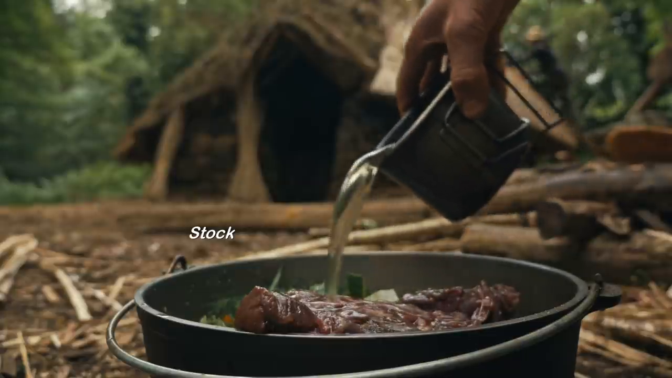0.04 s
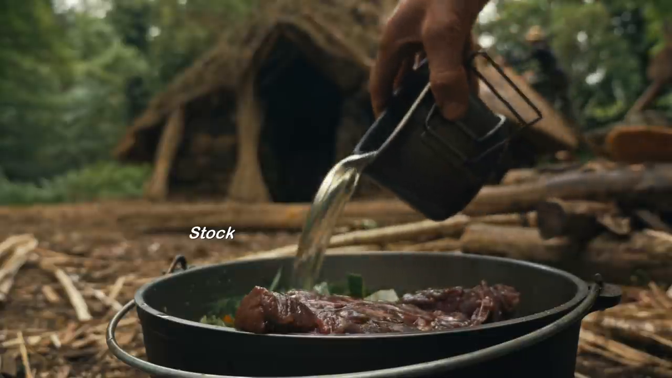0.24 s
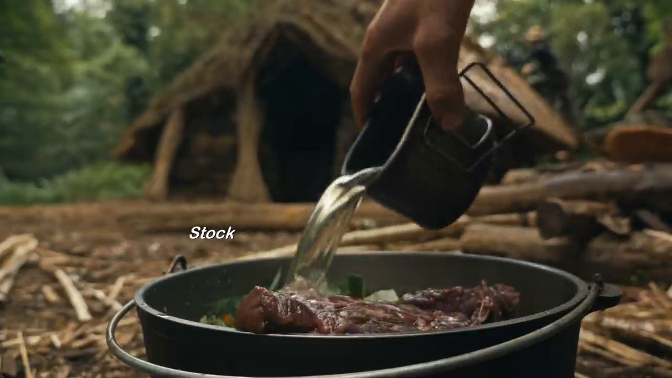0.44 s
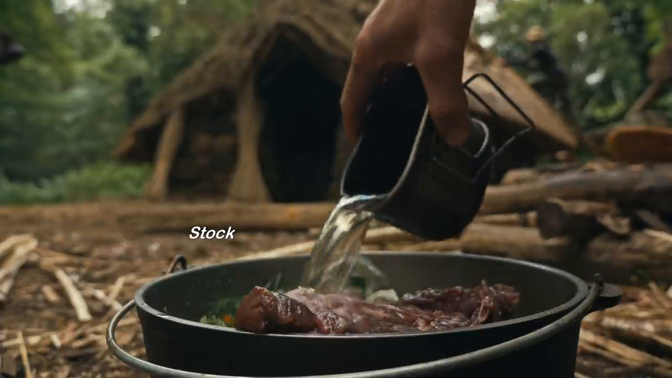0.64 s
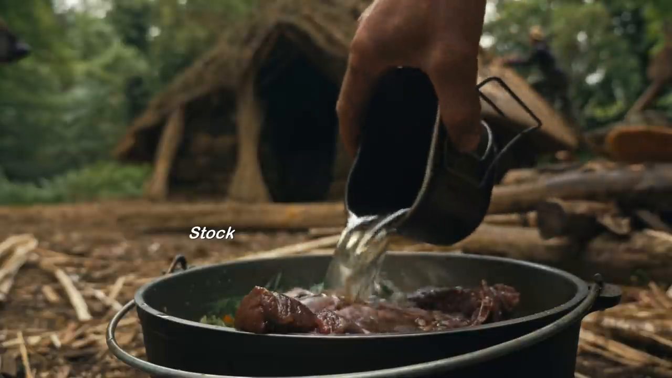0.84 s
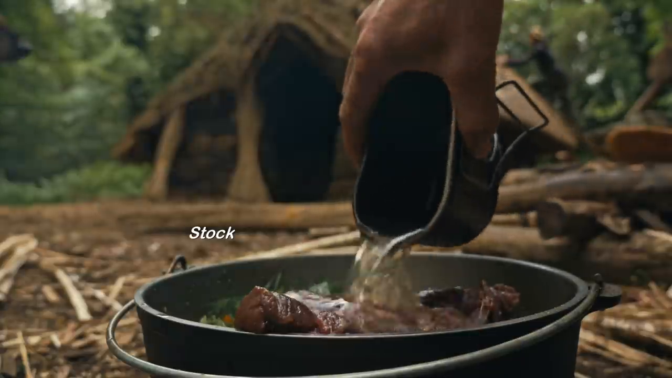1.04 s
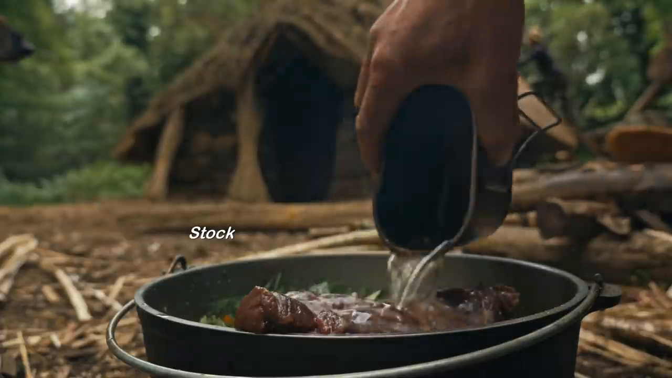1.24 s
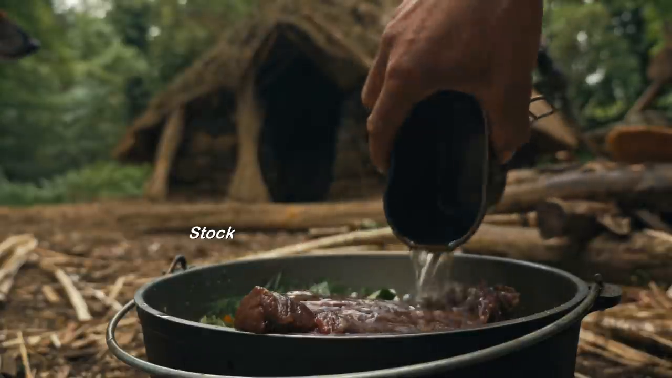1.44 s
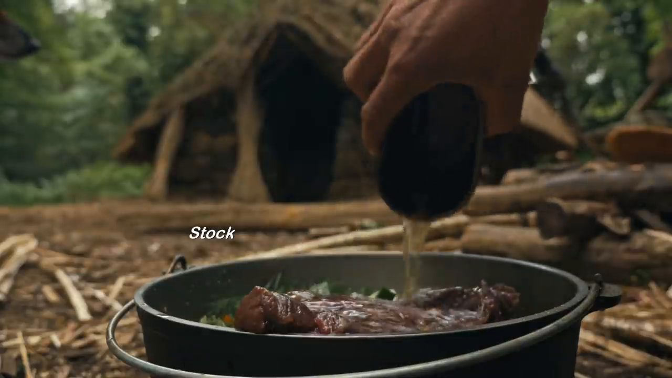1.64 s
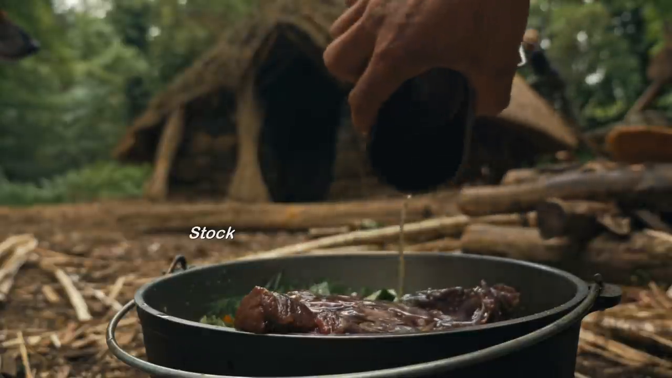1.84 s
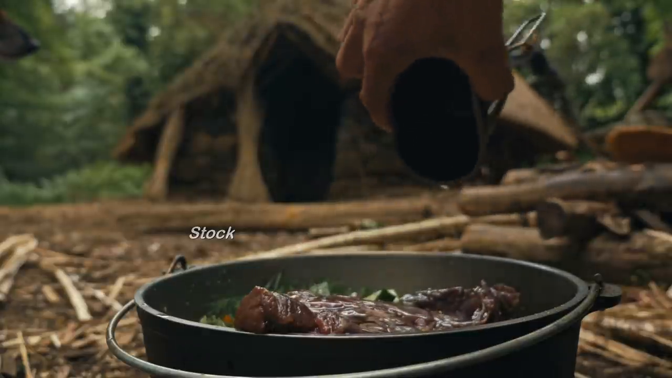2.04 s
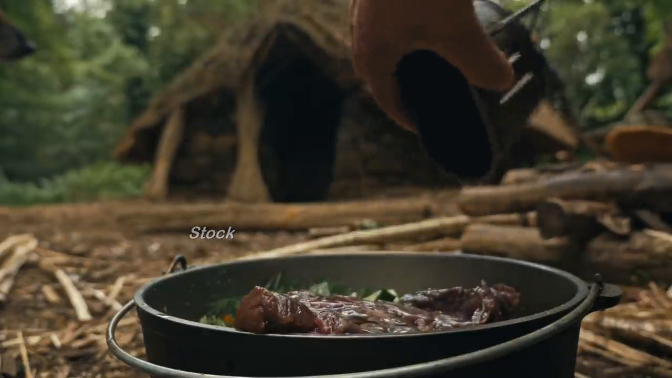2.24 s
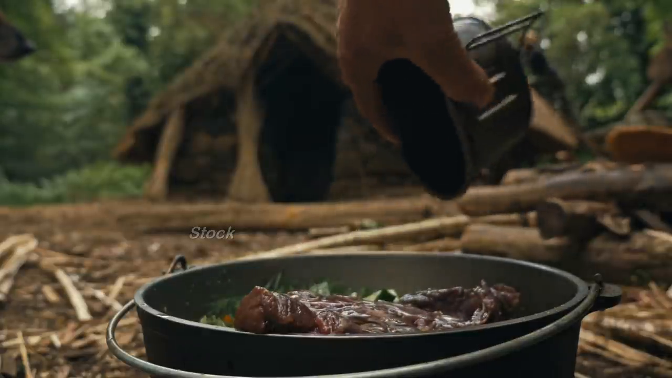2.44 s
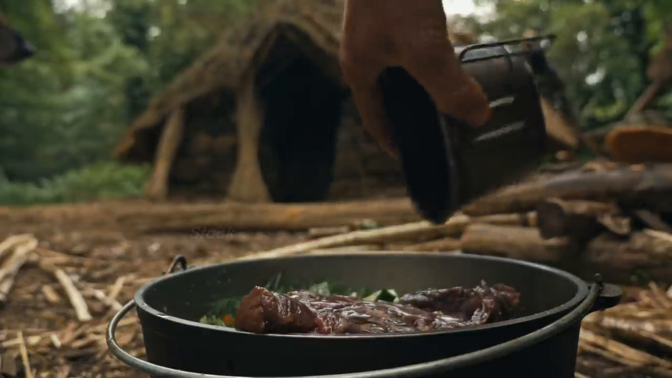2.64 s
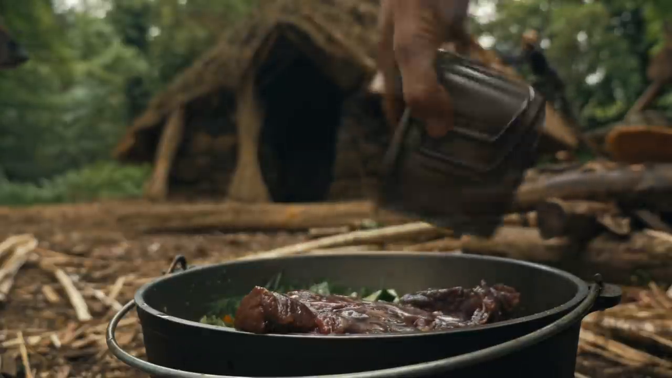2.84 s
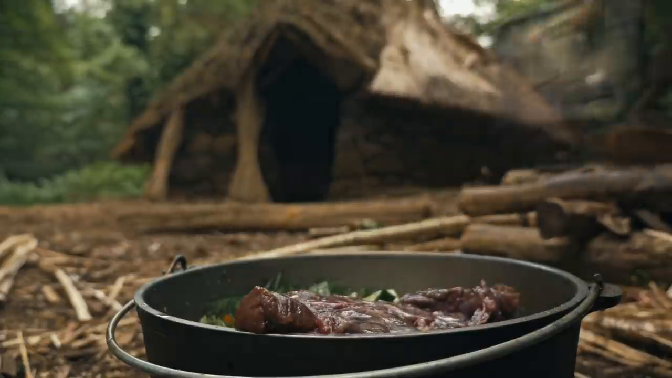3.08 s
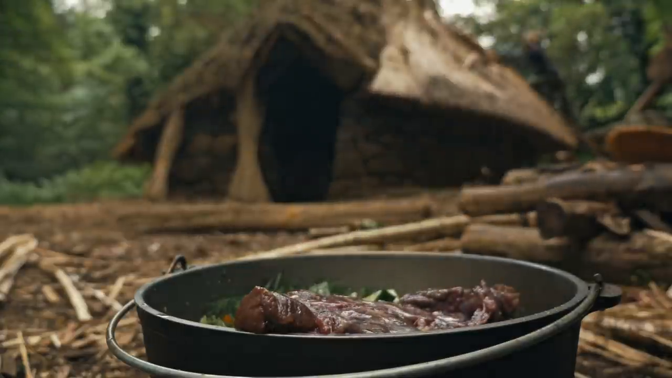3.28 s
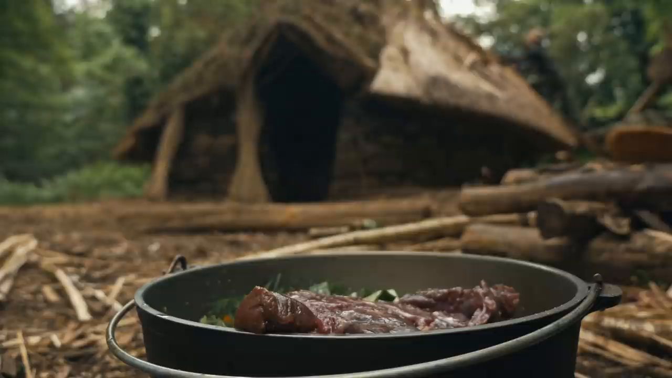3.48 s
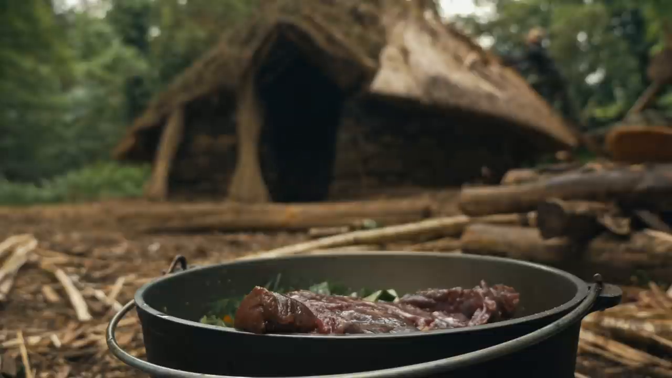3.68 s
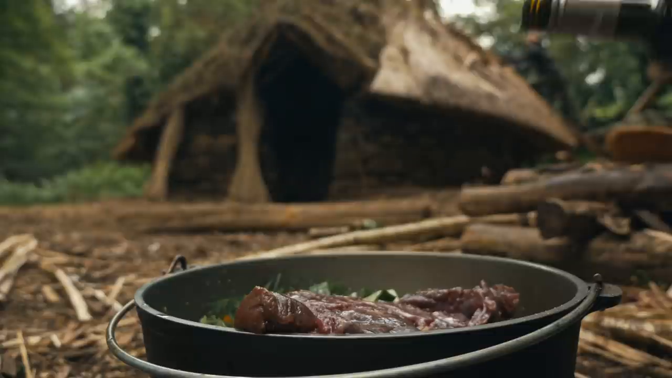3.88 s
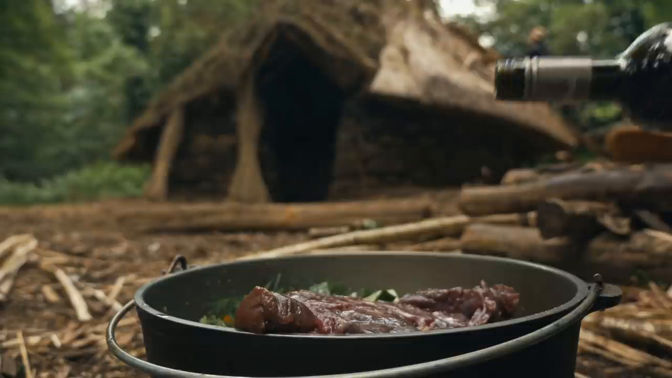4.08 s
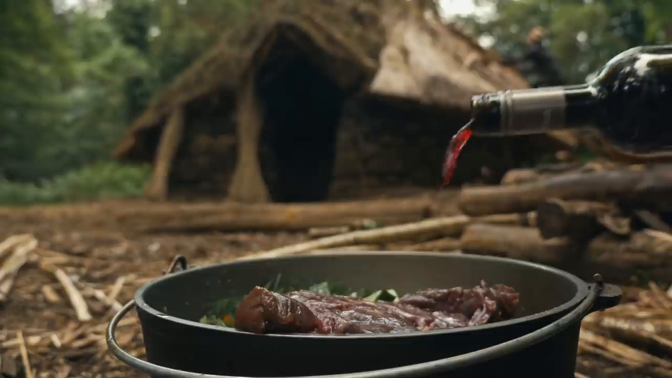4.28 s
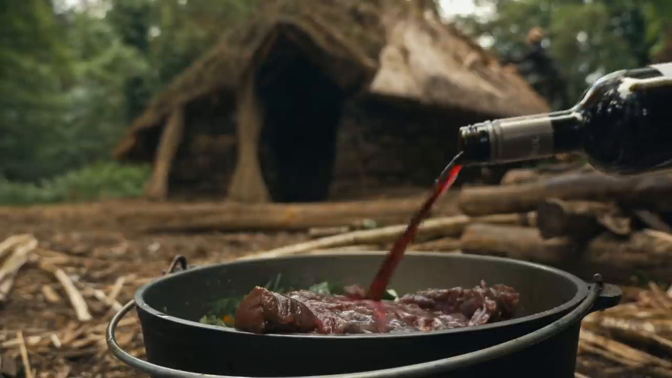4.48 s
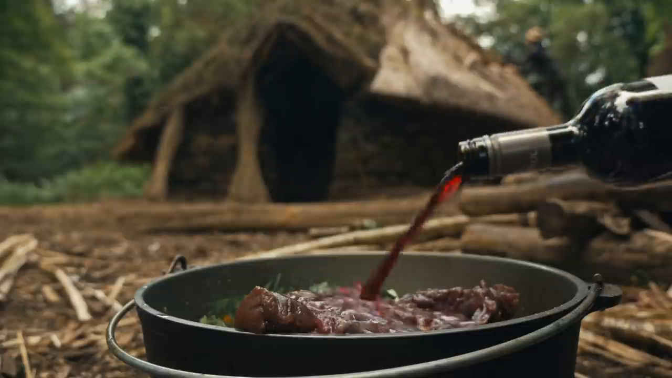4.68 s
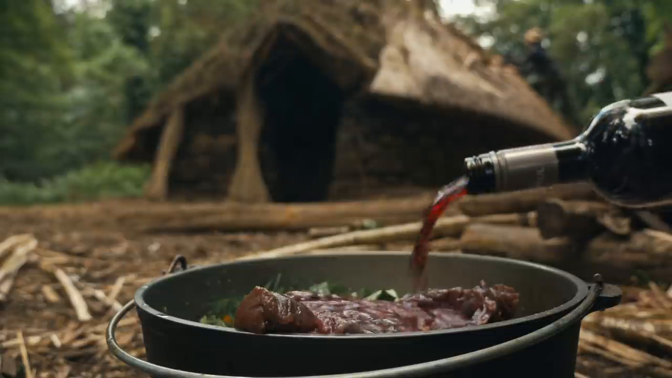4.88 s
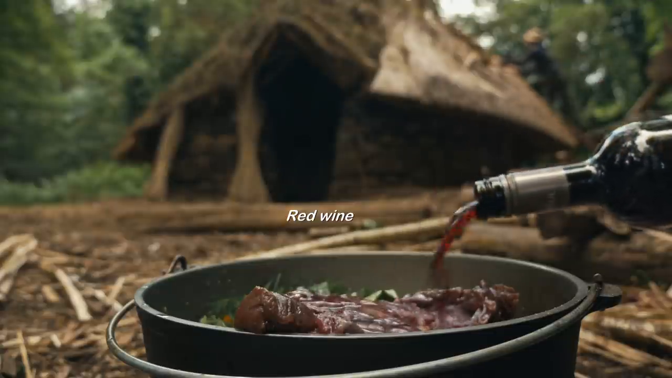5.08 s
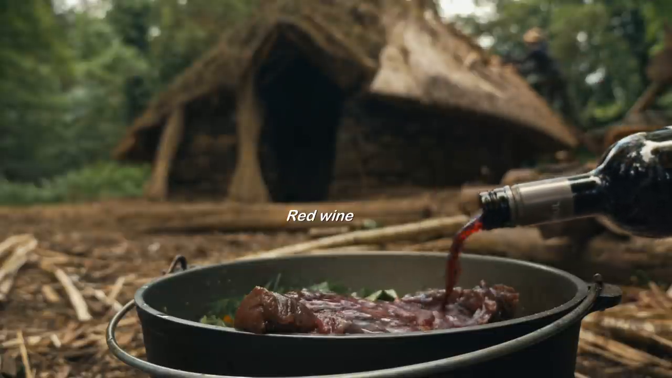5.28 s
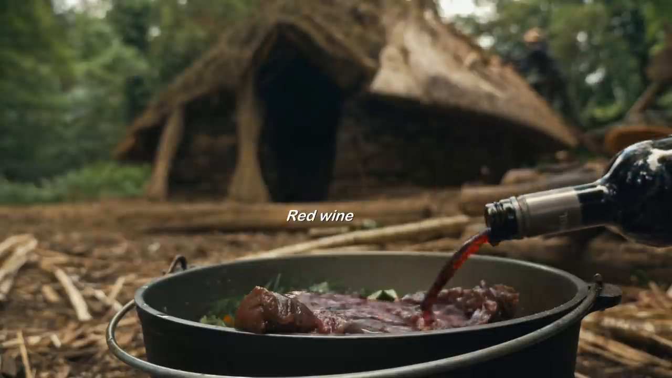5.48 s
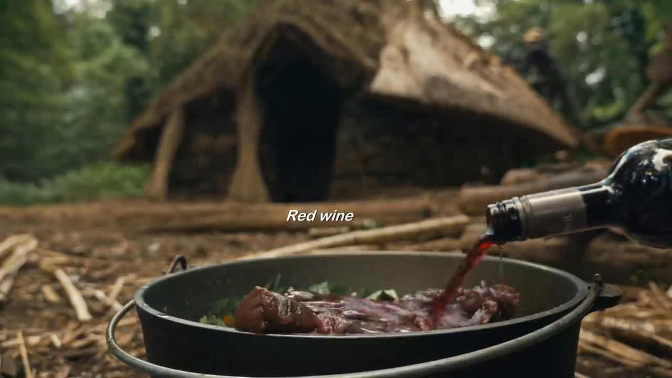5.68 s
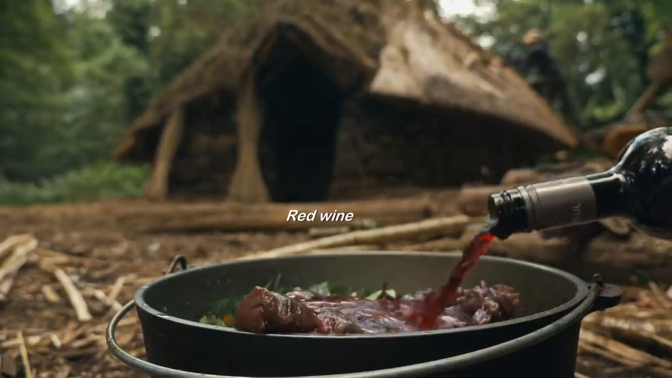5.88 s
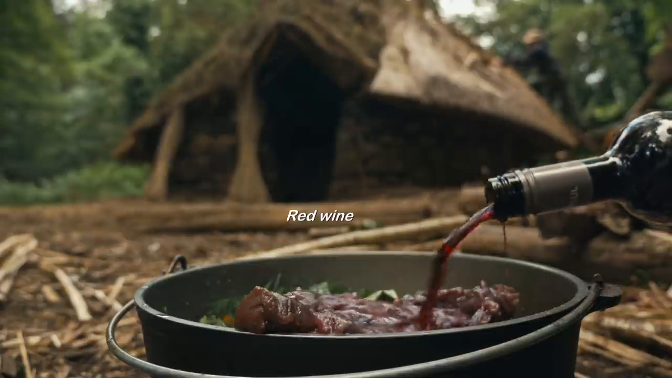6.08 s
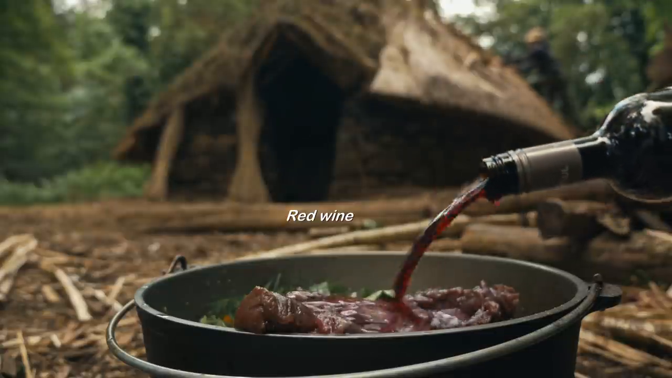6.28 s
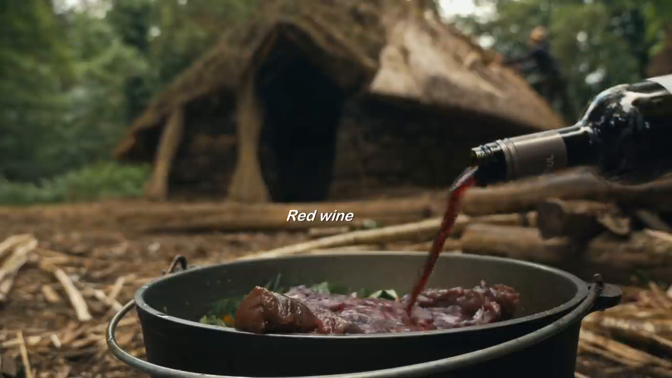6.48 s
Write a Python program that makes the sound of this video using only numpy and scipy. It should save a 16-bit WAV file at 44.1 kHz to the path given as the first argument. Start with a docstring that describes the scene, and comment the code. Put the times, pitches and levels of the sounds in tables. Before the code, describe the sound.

Close outdoor pouring: a bubbly splash of liquid over meat, a quiet sizzling gap with soft knocks, then gulping wine from a bottle.

```python
"""Water, then wine, over meat in a hot pot

Outdoors, water and then red wine hit meat in a hot iron pot: rising, ringing bubbles plus noisy ticks and slaps.
Filtered steam bursts and ringing crackles sizzle in swells; droplets pop as short bands of noise.
The wine bottle glugs and gulps as decaying tones with gliding pitch. Between the pours, filtered clicks
knock and rub a modal hollow body. Faint birds are gliding sines; a forest hum is filtered noise.
Table levels are nominal: layer gains, chance and filters act on them."""
import sys
import numpy as np
from scipy import signal
from scipy.fft import rfft, irfft
from scipy.io import wavfile
from scipy.ndimage import uniform_filter1d

SR = 44100
rng = np.random.default_rng(int(sys.argv[2]) if len(sys.argv) > 2 else 0)


def waveform_to_disk(signal):
    """Save audio, clipped to [-1, 1], as 16-bit WAV at the path in sys.argv[1]."""
    frames = np.transpose(np.atleast_2d(signal))
    scaled = np.clip(frames, -1, 1) * 32767
    samples = np.round(scaled).astype(np.int16)
    wavfile.write(sys.argv[1], SR, samples)


N = 287973
TIME = np.arange(N) / SR


def from_db(db):
    """Decibels to gain."""
    return 10 ** (np.asarray(db) / 20)


def rms_one(x):
    """Scale to unit power."""
    return x / np.sqrt(np.mean(x ** 2) + 1e-20)


def level(rows):
    """Gain over time from (t/s, level/dB) rows, silent outside them, with soft edges."""
    s, db = np.transpose(rows)
    inside = (TIME > s[0] - .02) & (TIME < s[-1] + .02)
    return from_db(np.interp(TIME, s, db)) * uniform_filter1d(inside * 1., size=400)


def gain_at(points, hz):
    """Read a spectrum on a log-frequency axis."""
    f, db = np.transpose(points)
    return from_db(np.interp(np.log(hz + 1e-9), np.log(f), db))


def colour(x, points):
    """Filter the whole signal by a spectrum."""
    return irfft(rfft(x) * gain_at(points, np.fft.rfftfreq(N, 1 / SR)), N)


def butter(x, hz, kind, order=2):
    """Causal low-, high- or band-pass."""
    sos = signal.butter(order, np.clip(hz, 10, .45 * SR), kind, fs=SR, output="sos")
    return signal.sosfilt(sos, x)


def drift(cutoff_hz):
    """Random wander of unit power: noise through a double one-pole low-pass."""
    r = np.exp(-2 * np.pi * cutoff_hz / SR)
    noise = rng.standard_normal(N + SR)
    return rms_one(signal.lfilter([1], [1, -2 * r, r * r], noise)[SR:])


def ring(x, hz, t60):
    """Two-pole resonator: a unit click sets off a decaying sine of initial height 1."""
    r = from_db(-60 / (t60 * SR))
    w = 2 * np.pi * min(hz, .45 * SR) / SR
    return signal.lfilter([0, np.sin(w)], [1, -2 * r * np.cos(w), r * r], x + 1e-18)


def add(out, s, sound):
    """Mix a short sound in at time s."""
    i = int(np.clip(round(s * SR), 0, N))
    out[i:i + len(sound)] += sound[:N - i]


def dying(t, t60):
    """Exponential decay, -60 dB at t60."""
    return np.exp(-np.log(1000) * t / t60)


def until(t, length, fade_s):
    """Gain that holds, then fades smoothly around the given length."""
    return .5 - .5 * np.tanh((t - length) / fade_s)


def clicks(per_s, spread_db):
    """Random clicks of either sign, many small and a few large."""
    sizes = from_db(spread_db * np.minimum(rng.exponential(1, N), 4.5))
    return sizes * rng.choice([-1, 1], N) * (rng.random(N) < per_s / SR)


def scatter(x, t60):
    """Quick, dense reflections: convolution with decaying noise of unit energy."""
    t = TIME[:SR // 4]
    tail = rng.standard_normal(len(t)) * dying(t, t60)
    return signal.fftconvolve(x, tail / np.linalg.norm(tail))[:N]


# steady simmer under the flares: t/s, level/dB
SIMMER = [(0, -56), (0.33, -59.5), (0.75, -53), (1.55, -67.5), (2.28, -66.5), (2.9, -67), (3.17, -61.5),
          (3.32, -71), (4.05, -59.5), (4.6, -54), (5.3, -55.5), (5.68, -67.5), (5.9, -58.5), (6.53, -58)]
# liquid creeps onto hot iron, sizzle flares: peak t/s, level/dB, rise/s, fall/s
FLARES = [(0.6, -45.5, 0.062, 0.083), (2.09, -58.5, 0.045, 0.072), (2.359, -55.5, 0.032, 0.006),
          (2.675, -55, 0.0036, 0.0092), (2.701, -48, 0.0078, 0.015), (2.75, -54.5, 0.21, 0.15),
          (3.225, -53.5, 0.023, 0.041), (3.268, -43.5, 0.0057, 0.0059), (3.31, -48.5, 0.045, 0.087),
          (3.342, -47, .008, 0.022), (3.5, -48, 0.22, 0.27), (3.529, -44.5, 0.0092, 0.033),
          (3.627, -45.5, .008, 0.038), (4.239, -42, 0.069, 0.066), (4.268, -42, .004, .014),
          (4.51, -48.5, 0.068, 0.037), (6.48, -48, 0.011, 0.057)]
FLARE_ROUNDNESS = 1.4   # 1 gives a pointed peak, 2 a bell
FLICKER_RMS_DB, FLICKER_CUTOFF_HZ = 2, 26   # drops skate over the iron


def heat():
    """Vigour of the sizzle: flares add their power to the simmer, and the sum flickers."""
    power = level(SIMMER) ** 2
    for s, db, rise_s, fall_s in FLARES:
        distance = np.maximum((s - TIME) / rise_s, (TIME - s) / fall_s)
        power += (from_db(db) * np.exp(-distance ** FLARE_ROUNDNESS)) ** 2
    return np.sqrt(power) * from_db(FLICKER_RMS_DB * drift(FLICKER_CUTOFF_HZ))


# steam spectrum: f/Hz, level/dB
STEAM_COLOUR = [(250, -23), (500, -7.5), (800, -8.5), (1350, 6), (2000, 3), (2800, -4), (4000, 3),
                (6000, 3), (8500, 5.5), (10500, -4), (14000, -3), (16000, -18)]


def sizzle(steam_db, crackle_db, crackles_per_s):
    """Countless tiny steam bursts on hot iron, in flurries, plus crackles that each ring for a few cycles."""
    bursts = clicks(24000, spread_db=2.0) * from_db(1.4 * drift(90))
    steam = rms_one(colour(bursts, STEAM_COLOUR))
    snaps = clicks(crackles_per_s, spread_db=3.5)
    pitches_hz = np.geomspace(3000, 10000, 8)
    dealt = rng.integers(0, len(pitches_hz), N)   # each snap gets one pitch
    crackles = sum(ring(snaps * (dealt == k), hz, 5.2 / hz) for k, hz in enumerate(pitches_hz))
    return heat() * (from_db(steam_db) * steam + from_db(crackle_db) * rms_one(crackles))


# outdoor hum: t/s, level/dB
HUM = [(0, -62.5), (0.8, -58), (1.1, -64.5), (2.7, -62.5), (3.35, -60.5), (6.53, -60)]
# hum spectrum: f/Hz, level/dB
FOREST = [(15, -32), (30, 7), (60, 2.5), (150, 3), (230, -1), (400, -4.5), (650, -6.5), (1000, -6.5),
          (1700, -11), (3000, -11.5), (6000, -51), (12000, -26)]


def hum(level_db, lumps_db):
    """Outdoor background: coloured noise whose bass wells up unevenly."""
    air = rms_one(colour(rng.standard_normal(N), FOREST))
    bass = butter(air, 510, "low", order=1)
    lumps = rms_one(from_db(lumps_db * drift(17.6)))
    return from_db(level_db) * level(HUM) * (air - bass + bass * lumps)


def background():
    """Sizzle from all over the pot, hum from all around; fresh chance at each call."""
    return sizzle(steam_db=1.5, crackle_db=-6.0, crackles_per_s=760) + hum(level_db=1.0, lumps_db=4.5)


SURGE_RMS_DB, SURGE_CUTOFF_HZ = 4.5, 12   # a stream wobbles about its mean flow
SPURT_GAIN, SPURT_RISE_S, SPURT_FALL_S = 0.53, 0.0021, 0.0089


def flow(pour):
    """Gain of a stream that wobbles, and spurts with each single bubble of PLOPS or glug of the bottle."""
    spurts, t = np.zeros(N), TIME[:SR // 4] - .015
    for s, *_ in PLOPS + GLUGS:
        add(spurts, s + t[0], np.exp(-np.maximum(-t / SPURT_RISE_S, t / SPURT_FALL_S)))
    surges = from_db(SURGE_RMS_DB * drift(SURGE_CUTOFF_HZ))
    return level(pour) * surges * (1 + SPURT_GAIN * np.minimum(spurts, 1))


def bubble(hz, cycles, rise, swell_cycles):
    """A bubble swells, rings down 60 dB in some cycles and climbs in pitch as it nears the surface."""
    turn = np.arange(int(cycles * SR / hz) + 2) * hz / SR
    phase = 2 * np.pi * turn * (1 + rise * (turn / cycles / 2 - .15))
    return np.sin(phase) * dying(turn, cycles) * (1 - np.exp(-turn / swell_cycles))


def splash(pour, spectrum, count, cycles, rise, spread_db, level_db):
    """The stream breaks into bubbles of all sizes, many faint and a few loud; only some glide far."""
    out, start, end = np.zeros(N), pour[0][0], pour[-1][0]
    for k, (when, size, force, life, climb) in enumerate(rng.random((count, 5))):
        s = start + (end - start) * (k + when) / count
        hz = 380 * 40 ** size
        height = gain_at(spectrum, hz) * hz * from_db(-spread_db * np.log(force + .05))
        ringing = cycles * (.5 + life) * (hz / 3000) ** 0.52
        add(out, s, height * bubble(hz, ringing, rise * climb ** 2, swell_cycles=0.44))
    unit = rms_one(out) * np.sqrt((end - start) * SR / N)   # unit power within the pour
    return from_db(level_db) * flow(pour) * unit


def slap(pour, spectrum, per_s, level_db):
    """The stream's own impact on the meat is a coarse, irregular crackle."""
    crackle = colour(clicks(per_s, spread_db=5.0), spectrum)
    return from_db(level_db) * flow(pour) * rms_one(crackle)


# flow of water onto the meat: t/s, level/dB
WATER = [(0, -56.5), (0.12, -55), (0.3, -63), (0.52, -58.5), (0.58, -54.5), (0.88, -56), (1.27, -55),
         (1.48, -53.5), (1.6, -58.5), (1.7, -59), (1.745, -68.5), (1.785, -55.5), (1.845, -55.5),
         (1.875, -61.5), (1.91, -58), (2.05, -65)]
# water bubble spectrum: f/Hz, level/dB
WATER_COLOUR = [(350, -4), (470, -0.5), (700, -9), (1000, 0), (1400, 1.5), (2700, -1), (4000, -3.5),
                (6000, -6.5), (8500, -6), (10500, -18.5), (15000, -14.5)]


def water():
    """Water pour: short and long-ringing bubbles, slap on the meat, gloops in the pool."""
    short = splash(WATER, WATER_COLOUR, count=6000, cycles=12, rise=0.2, spread_db=8, level_db=0)
    long = splash(WATER, WATER_COLOUR, count=1200, cycles=58, rise=0.93, spread_db=2.0, level_db=-0.5)
    return short + long + slap(WATER, WATER_COLOUR, per_s=1200, level_db=-9.0) + churn(level_db=-37.5)


def plops(rows, cycles, rise, swell_cycles, level_db):
    """Single bubbles, each trailed by a weaker one split from it."""
    out = np.zeros(N)
    for (s, db, hz), (lag, size, life) in zip(rows, rng.random((len(rows), 3))):
        gain = from_db(db + level_db)
        split_hz = hz * (0.659 + 0.675 * size)
        add(out, s, gain * bubble(hz, cycles * (1.0 + 0.19 * life), rise, swell_cycles))
        add(out, s + 0.004 * lag, gain * from_db(-10.0) * bubble(split_hz, cycles, rise, swell_cycles))
    return out


IMPACT_T60_S, IMPACT_SPAN = 0.0029, 2.1   # span: ratio either side of the bubble's pitch


def impacts(rows, level_db):
    """Each drop hits the surface with a sharp noise tick just as its bubble is born."""
    out, t = np.zeros(N), TIME[:SR // 100]
    for (s, db, hz), noise in zip(rows, rng.standard_normal((len(rows), len(t)))):
        tick = butter(noise * dying(t, IMPACT_T60_S), [hz / IMPACT_SPAN, hz * IMPACT_SPAN], "band")
        add(out, s, from_db(db + level_db) * tick / np.abs(tick).max())
    return out


def pops(rows, top_t60, body_t60, top_db, body_db):
    """A droplet bursts on hot iron: a short bright crack and a longer spit below it."""
    out, t = np.zeros(N), TIME[:SR // 30]
    for (s, high_db, low_db), noise in zip(rows, rng.standard_normal((len(rows), len(t)))):
        crack = butter(noise * dying(t, top_t60), [7000, 14500], "band")
        spit = butter(noise * dying(t, body_t60), [1200, 5000], "band")
        add(out, s, from_db(high_db + top_db) * crack / np.abs(crack).max())
        add(out, s, from_db(low_db + body_db) * spit / np.abs(spit).max())
    return out


def cluster(rows, count, within_s, octaves, weaker_db):
    """Weaker bubbles or drops around each given one: rows of t/s, level/dB, f/Hz."""
    parents = rows * count
    return [(s + within_s * (2 * when - 1), db - weaker_db * (1 + force), hz * 2 ** (octaves * size))
            for (s, db, hz), (when, force, size) in zip(parents, rng.random((len(parents), 3)))]


DROPS_FOLLOW_FLOW = 0.47   # share of the flow's dB swing that drops take on


def strays(pour, count, low_hz, high_hz, top_db, spread_db):
    """Random drops or bubbles through a pour, louder when it runs hard: rows of t/s, level/dB, f/Hz."""
    knots, flow_db = np.transpose(pour)
    when, force, size = rng.random((count, 3)).T
    s = knots[0] + (knots[-1] - knots[0]) * (np.arange(count) + when) / count
    swing_db = np.interp(s, knots, flow_db) - flow_db.max()
    db = top_db + DROPS_FOLLOW_FLOW * swing_db - spread_db * force
    return list(zip(s, db, low_hz * (high_hz / low_hz) ** size))


# single ringing bubbles in both pours, low and high, loud and faint: t/s, level/dB, f/Hz
PLOPS = [(0.0176, -25, 2010), (0.0498, -42, 4400), (0.0684, -29.5, 2420), (0.0785, -40, 3200),
         (0.0885, -29, 2010), (0.117, -35, 1500), (0.155, -37, 2930), (0.173, -35, 3050),
         (0.3767, -29, 2900), (0.451, -26, 2350), (0.4733, -28.5, 1047), (0.536, -40, 1140),
         (0.5571, -27, 1640), (0.581, -32, 1730), (0.5934, -26, 1470), (0.6075, -26, 1600),
         (0.6243, -25.5, 3000), (0.694, -26.5, 2920), (0.722, -30.5, 3130), (0.730, -35, 2280),
         (0.757, -32, 2030), (0.7889, -16.5, 2940), (0.8345, -23, 5500), (0.8823, -36, 2160),
         (0.9738, -23.5, 2520), (1.0018, -23, 3575), (1.0199, -22, 2040), (1.02, -30, 3060),
         (1.0814, -30, 1250), (1.084, -28, 3050), (1.1225, -29, 4260), (1.154, -26.5, 3580),
         (1.187, -31, 1880), (1.2081, -25.5, 1780), (1.209, -30.5, 1115), (1.231, -24.5, 1174),
         (1.2522, -19.5, 2590), (1.2755, -28, 1320), (1.284, -23, 1370), (1.288, -27.5, 2750),
         (1.300, -28, 1310), (1.317, -26, 4140), (1.3356, -29, 3640), (1.341, -29.5, 2750),
         (1.3773, -35, 2240), (1.385, -27, 3390), (1.437, -26, 2630), (1.4416, -23.5, 2880),
         (1.4458, -24, 3500), (1.45, -23, 1405), (1.482, -32.5, 1580), (1.5935, -37, 2900),
         (1.6982, -30, 2700), (1.7771, -40.5, 1230), (1.8324, -28, 4430), (1.855, -35, 3940),
         (1.9095, -27, 4660), (4.454, -35, 1310), (4.524, -41, 2000), (4.668, -22, 2940),
         (4.712, -27.5, 3100), (4.7453, -33, 3320), (4.815, -35.5, 2020), (4.962, -38, 2040),
         (4.982, -38, 2130), (5.0775, -33, 3130), (5.1076, -28, 3250), (5.3565, -22.5, 5480),
         (5.421, -36, 2760), (5.542, -38, 2400), (5.7675, -42, 2210), (5.849, -34.5, 2040),
         (5.8768, -32, 2990), (5.9837, -35, 2800), (6.1038, -32, 3850), (6.1442, -24, 4040),
         (6.4138, -42, 3100)]
# single drops that land with a tick and a short high ring: t/s, level/dB, f/Hz
SPATTER = [(0.119, -29, 8700), (0.2918, -36, 4910), (0.3102, -29.5, 8000), (0.4239, -27, 8300),
           (0.4357, -32, 8650), (0.45, -31, 8740), (0.4574, -25.5, 8270), (0.4962, -27, 12800),
           (0.5682, -19, 8600), (0.6148, -25, 8200), (0.6757, -22.5, 8200), (0.7233, -25.5, 8400),
           (0.8246, -25.5, 8700), (0.8605, -26, 7800), (0.932, -28, 5640), (0.9762, -31.5, 7650),
           (1.2065, -20.5, 6670), (1.2482, -32, 6500), (1.4224, -30.5, 3700), (1.4582, -22.5, 8100),
           (1.503, -30, 6680), (1.5458, -30.5, 4330), (1.5614, -34, 7200), (1.6365, -31, 7840),
           (1.6502, -35, 7020), (1.774, -31, 8800), (1.8066, -47, 8800), (2.0107, -24.5, 5850),
           (4.5738, -36, 8200), (4.8077, -32, 6970), (4.825, -26, 5800), (4.8452, -32, 6300),
           (4.8871, -37.5, 5900), (4.8933, -33, 5510), (4.9252, -28.5, 8400), (5.0108, -38, 7260),
           (5.024, -33, 7150), (5.1263, -32, 8150), (5.1388, -30, 7400), (5.164, -34, 5130),
           (5.281, -31, 8180), (5.2911, -37, 5460), (5.3155, -25, 6800), (5.337, -31, 7700),
           (5.374, -31, 5760), (5.5042, -26, 3020), (5.5643, -36, 4000), (5.575, -33.5, 3670),
           (5.6312, -30, 5420), (5.737, -29, 7600), (5.8108, -28, 4650), (5.8275, -34, 5560),
           (5.9696, -35, 7230), (5.976, -38, 6030), (5.9843, -31.5, 7000), (6.0593, -26, 6900),
           (6.0674, -28, 6930), (6.098, -34, 6850), (6.1454, -26.5, 5630), (6.1761, -36, 5800),
           (6.1966, -37, 6680), (6.2773, -38, 3420), (6.2904, -30, 8000), (6.4745, -31, 7400)]
# single droplets that burst on the iron, strong and faint: t/s, crack level/dB, spit level/dB
POPS = [(0.5681, -45, -41), (0.7893, -45, -38.5), (1.2478, -37.5, -62), (1.6376, -57, -51.5),
        (2.0103, -57, -69), (2.593, -59, -52.5), (3.0011, -43.5, -55.5), (3.0562, -57, -60),
        (3.807, -75, -54.5), (4.9246, -65, -64), (5.3138, -42, -45), (5.5034, -45.5, -40)]
# wine thrown into the pot by each gulp: lag/s, level/dB, lowest f/Hz
GULP_SPRAY = (0.017, -36.5, 2960)


def droplets(crack_db, spit_db):
    """Single bubbles and drops of both pours, listed and random; some burst on the iron."""
    lag_s, thrown_db, thrown_hz = GULP_SPRAY
    thrown = [(s + lag_s, thrown_db, thrown_hz) for s, *_ in GULPS]
    pockets = cluster(PLOPS, count=2, within_s=0.016, octaves=0.736, weaker_db=11.0)
    pockets += cluster(thrown, count=2, within_s=0.019, octaves=1.58, weaker_db=10.0)
    spray = cluster(SPATTER, count=1, within_s=0.027, octaves=-1.25, weaker_db=18.0)
    spray += strays(WATER, count=60, low_hz=2940, high_hz=8700, top_db=-41.5, spread_db=14)
    spray += strays(WINE, count=50, low_hz=3640, high_hz=8850, top_db=-30, spread_db=11)
    bursts = [(s, db + crack_db, db + spit_db) for s, db, hz in spray[::4]]
    out = plops(PLOPS, cycles=32.7, rise=0.14, swell_cycles=0.98, level_db=-3.5)
    out += impacts(PLOPS, level_db=-12)
    out += plops(pockets, cycles=28.6, rise=0.27, swell_cycles=4.1, level_db=4.0)
    out += plops(SPATTER, cycles=17.6, rise=0.057, swell_cycles=1.86, level_db=8)
    out += impacts(SPATTER, level_db=-12)
    out += plops(spray, cycles=24, rise=0.057, swell_cycles=2.4, level_db=5.5)
    out += pops(POPS + bursts, top_t60=0.00087, body_t60=0.012, top_db=16.0, body_db=13.5)
    return out


POOL_FORMS_S = 0.94   # from here on the water falls into a pool


def churn(level_db):
    """The stream stirs the pool it has made into soft, low gloops."""
    rows = strays(WATER, count=70, low_hz=330, high_hz=680, top_db=level_db, spread_db=15)
    gloops = [row for row in rows if row[0] > POOL_FORMS_S]
    return plops(gloops, cycles=6, rise=0.27, swell_cycles=1.0, level_db=0)


# far birds: t/s, length/s, start f/Hz, end f/Hz, level/dB
BIRDS = [(1.09, 0.16, 6940, 6950, -65), (1.68, 0.066, 5900, 5520, -55), (1.724, 0.4, 6600, 6500, -81),
         (1.962, 0.27, 5700, 5500, -61), (2.211, 0.11, 3400, 3440, -65), (2.33, 0.092, 6200, 6120, -55),
         (2.42, 0.1, 6300, 6150, -64), (2.504, 0.048, 7500, 7400, -64), (2.633, 0.058, 4420, 4750, -64),
         (2.82, 0.09, 7950, 7750, -67), (2.95, 0.1, 5900, 5550, -57), (3.037, 0.11, 8060, 7750, -75)]


def birds(waver):
    """Thin whistles: gliding sines with a random waver in pitch."""
    out, wobble = np.zeros(N), 1 + waver * drift(290)
    for s, length, start_hz, end_hz, db in BIRDS:
        u = np.linspace(0, 1, int(length * SR))
        hz = (start_hz + (end_hz - start_hz) * u) * wobble[int(s * SR):][:len(u)]
        add(out, s, from_db(db) * np.sin(np.pi * u) * np.sin(2 * np.pi * np.cumsum(hz) / SR))
    return out


# hollow knocks beside the pot: t/s, level/dB, contact cut-off f/Hz, pitch ratio
KNOCKS = [(2.0641, -37.5, 960, 1), (2.083, -52, 2000, 1.28), (2.093, -37, 620, 0.96),
          (2.118, -32.5, 720, 0.99), (2.3139, -32.5, 1470, .99), (2.332, -37.5, 1400, .96),
          (2.358, -39, 710, 0.92), (2.612, -45.5, 1000, 0.97), (2.804, -40.5, 1000, 1.023),
          (3.08, -50.5, 1300, 0.89), (3.144, -43.5, 2410, 1.02), (3.156, -42, 905, .97),
          (3.226, -43.5, 750, 1), (3.266, -46.5, 795, 0.96)]
# modes of the hollow body: f/Hz, level/dB, t60/s
KNOCK_MODES = [(388, -6.5, 0.0089), (470, -19.5, 0.083), (620, -6, 0.016), (710, 2, 0.055),
               (930, -4.5, 0.08), (1130, 3.5, 0.012), (1317, 3.5, 0.023), (1450, -17, .04),
               (1650, -15, 0.03)]
LONGEST_RING_S = 0.07   # t60 cap: the contact damps the body


def knocks(level_db, detune, uneven_db):
    """Soft and hard contacts strike one hollow body, each elsewhere: modes vary in pitch and strength."""
    out = np.zeros(N)
    chances = rng.standard_normal((len(KNOCKS), len(KNOCK_MODES), 2))
    for (s, db, contact_hz, ratio), chance in zip(KNOCKS, chances):
        force = butter(signal.unit_impulse(SR // 8), contact_hz, "low", order=3)
        force = from_db(db + level_db) * force
        for k, ((hz, mode_db, t60), (shift, strength)) in enumerate(zip(KNOCK_MODES, chance)):
            gain = (-1) ** k * from_db(mode_db + uneven_db * strength)
            mode_hz = hz * ratio * np.exp(detune * shift)
            add(out, s, gain * ring(force, mode_hz, min(t60, LONGEST_RING_S)))
    return out


# light rubbing on the same body: t/s, level/dB
RUB = [(2.98, -68), (3.06, -63), (3.13, -65), (3.21, -57), (3.29, -73)]


def rub(low_hz, high_hz):
    """Small slips come in fits and stir mostly the middle modes of the hollow body."""
    slips = butter(clicks(540, spread_db=1.5), [low_hz, high_hz], "band")
    slips = slips * from_db(3 * drift(30))
    body = sum(from_db(db) * ring(slips, hz, t60) for hz, db, t60 in KNOCK_MODES)
    return level(RUB) * rms_one(body)


# soft bumps of handling: peak t/s, f/Hz, level/dB, t60/s
BUMPS = [(3.086, 205, -38.5, 0.015), (3.745, 208, -41.5, 0.013), (4.163, 360, -41.5, 0.016)]
THUMP_SWELL_CYCLES = 0.36   # time constant of the build-up


def thumps(rows):
    """Low resonances that build up to a peak and die away."""
    out, t = np.zeros(N), TIME[:SR // 3] - .04
    for s, hz, db, t60 in rows:
        shape = np.exp(np.minimum(t, 0) * hz / THUMP_SWELL_CYCLES) * dying(np.maximum(t, 0), t60)
        add(out, s + t[0], from_db(db) * shape * np.cos(2 * np.pi * hz * t))
    return out


# flow of wine onto the meat: t/s, level/dB
WINE = [(4.4, -55.5), (4.55, -53), (5.1, -53.5), (5.4, -57), (5.68, -62), (5.8, -53.5), (6.07, -54),
        (6.125, -84), (6.19, -64), (6.3, -60), (6.53, -53)]
# wine bubble spectrum: f/Hz, level/dB
WINE_COLOUR = [(350, 1), (800, -3.5), (1300, -5), (2000, -15.5), (3000, 6.5), (4500, -5.5), (6000, -4),
               (8000, -1), (10500, -11.5), (15000, -9)]


def wine():
    """Wine pour: bubbles of all sizes with little rise in pitch."""
    return splash(WINE, WINE_COLOUR, count=1800, cycles=24, rise=0.07, spread_db=4.0, level_db=-2.5)


# air in the bottle bounces at each gulp:
# peak t/s, f/Hz, level/dB, t60/s, swell/s, length/s, glide/(octaves per s)
GLUGS = [(4.592, 94, -32, 0.09, 0.0086, 0.05, 14), (4.705, 70.6, -41, 0.081, 0.013, .045, -8),
         (4.9, 80.4, -31, .055, 0.0074, 0.036, 3), (5.114, 84.4, -33, 0.11, 0.014, 0.055, 2),
         (5.307, 95, -28.5, 0.02, 0.0046, .04, 0), (5.469, 111, -32.5, 0.033, 0.0043, .047, 2),
         (5.614, 76.4, -30, 0.36, 0.00023, 0.033, 12), (5.783, 92, -34.5, 0.21, 0.0039, 0.11, -14),
         (5.893, 280, -24, 0.021, 0.0012, .03, 24), (5.953, 63, -37, 0.24, 0.004, 0.12, 5),
         (6.041, 69.6, -28, 0.079, 0.0037, .075, -1), (6.217, 169, -29.5, 0.024, 0.00086, .03, -6)]


def glugs(start_octaves, pinch_octaves, pinch_s, overtone):
    """Air pushes into the neck: pitch swoops up to the pinch, then the pocket rings and glides until it breaks."""
    out, t = np.zeros(N), TIME[:SR // 5] - .05
    before, after = np.minimum(t, 0), np.maximum(t, 0)
    pinch = pinch_octaves * np.exp(-np.abs(t) / pinch_s)
    swoop = start_octaves * (1 - np.exp(before / 0.0082))
    for s, hz, db, t60, swell_s, length, glide in GLUGS:
        octaves = pinch - swoop + glide * after
        phase = 2 * np.pi * np.cumsum(hz * 2 ** octaves) / SR
        phase = phase - np.interp(0, t, phase)   # zero phase at the peak
        shape = np.exp(before / swell_s) * dying(after, t60) * until(t, length, fade_s=0.0037)
        tone = np.cos(phase) + overtone * shape * np.sin(2 * phase)
        add(out, s + t[0], from_db(db) * shape * tone)
    return out


# bubbles pinch off in the bottle neck:
# t/s, length/s, start f/Hz, middle f/Hz, end f/Hz, level/dB, t60/s
GULPS = [(4.648, 0.02, 1310, 1360, 1070, -36, 0.066), (4.689, 0.051, 800, 944, 910, -50.5, 0.45),
         (4.753, 0.034, 1166, 1290, 970, -28.5, 0.09), (4.9, .025, 1120, 1200, 1200, -51, 0.042),
         (4.942, 0.026, 1340, 1460, 1200, -31.5, 0.056), (5.11, .02, 1180, 1250, 1220, -41.5, 0.036),
         (5.305, .025, 1250, 1052, 1020, -39.5, 0.084), (5.462, 0.013, 1100, 1310, 1400, -37, 0.024),
         (5.468, 0.036, 1450, 1425, 1390, -39, 0.092), (5.469, 0.033, 1620, 1680, 1780, -51, .1),
         (5.514, 0.024, 1160, 1240, 1080, -30.5, 0.099), (5.616, 0.042, 1230, 1400, 1430, -36, 0.1),
         (5.65, 0.032, 1270, 1360, 990, -30, 0.067), (5.787, 0.042, 970, 1306, 1560, -30.5, 0.078),
         (5.789, 0.049, 1790, 1810, 1780, -50.5, 0.22), (5.835, .06, 900, 870, 865, -55, 0.25),
         (5.853, 0.025, 1440, 1540, 1290, -33.5, 0.027), (5.896, 0.063, 890, 845, 915, -31, 0.13),
         (5.92, 0.013, 1490, 1680, 1720, -41, 0.063), (5.927, 0.019, 2260, 2376, 2230, -34, 0.074),
         (5.947, 0.049, 880, 1120, 1630, -40, 0.095), (5.967, .04, 1720, 1750, 1720, -50, 0.13),
         (6.04, 0.011, 1290, 1250, 1150, -43.5, .07), (6.06, 0.03, 905, 970, 1070, -45.5, 0.083),
         (6.117, 0.029, 1220, 1300, 1050, -35.5, 0.068), (6.144, 0.015, 1130, 1080, 1040, -44, 0.047),
         (6.216, 0.022, 1020, 1200, 1350, -47, 0.07), (6.409, 0.053, 1390, 1470, 1250, -38, 0.041)]


def gulps(snap_db, snap_t60, attack_s):
    """A bubble snaps off and rings; its pitch follows an arc as it merges with the air in the bottle."""
    out, t = np.zeros(N), TIME[:SR // 10]
    for s, length, start_hz, middle_hz, end_hz, db, t60 in GULPS:
        arc = np.polyfit([0, .5, 1], np.log([start_hz, middle_hz, end_hz]), 2)
        hz = np.exp(np.polyval(arc, np.minimum(t / length, 1.2)))
        tone = np.sin(2 * np.pi * np.cumsum(hz) / SR) * dying(t, t60) * until(t, length, fade_s=0.0036)
        snap = from_db(snap_db) * dying(t, snap_t60)
        add(out, s, from_db(db) * (tone + snap) * (1 - np.exp(-t / attack_s)))
    return out


# spectrum of the side signal: f/Hz, level/dB
SPREAD = [(60, -32), (250, -20.5), (1000, -25.5), (4000, -25), (9000, -18.5), (14000, -13.5)]


def scene():
    """Close sounds sit near the middle; a faint, randomly modulated copy and fresh background form the side."""
    liquid = water() + wine() + droplets(crack_db=-21, spit_db=-18.5)
    liquid = liquid + from_db(-10.0) * scatter(liquid, t60=0.074)
    bottle = glugs(start_octaves=1.0, pinch_octaves=0.48, pinch_s=0.0039, overtone=0.27)
    bottle = bottle + gulps(snap_db=-1.0, snap_t60=0.0062, attack_s=0.00016)
    neck = scatter(butter(bottle, 160, "high"), t60=0.03)   # the glass neck rings on briefly
    bottle = bottle + from_db(-18.5) * neck
    knocked = knocks(level_db=-0.5, detune=0.015, uneven_db=3.4) + rub(low_hz=780, high_hz=1130)
    handling = knocked + from_db(-18.0) * scatter(knocked, t60=0.33) + thumps(BUMPS)
    close = liquid + bottle + handling
    mid = close + background() + scatter(birds(waver=0.019), t60=0.14)
    side = colour(close * drift(56) + background(), SPREAD)
    return np.array([mid + side, mid - side])


CUTOFF_HZ = 15900


def record(dry):
    """The deepest bass is rolled off and the top is cut steeply."""
    thinned = butter(dry, 27, "high")
    return signal.sosfilt(signal.ellip(10, .2, 80, CUTOFF_HZ, fs=SR, output="sos"), thinned)


dry = scene()
out = record(dry)
waveform_to_disk(out)
```